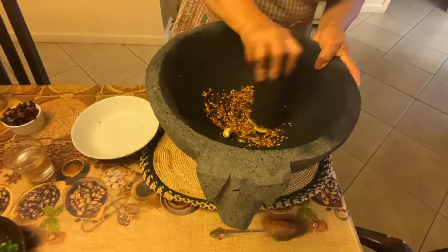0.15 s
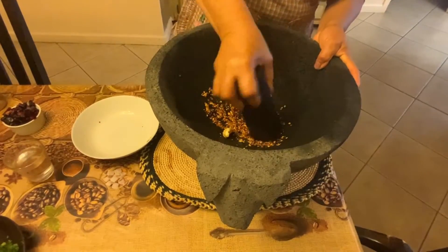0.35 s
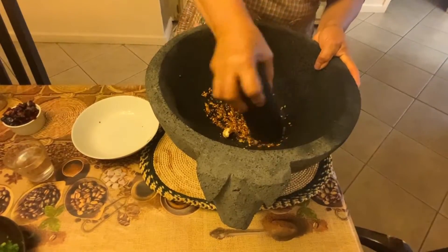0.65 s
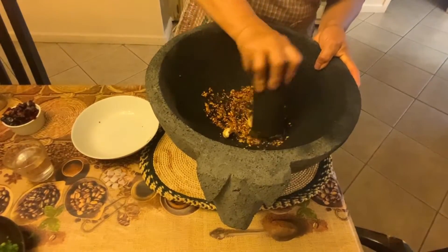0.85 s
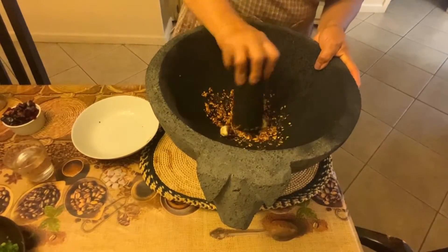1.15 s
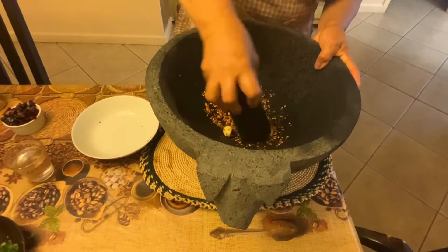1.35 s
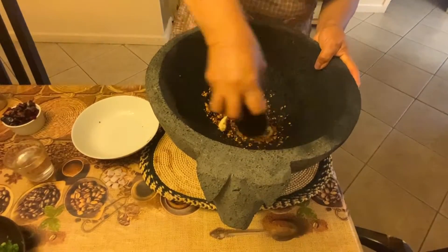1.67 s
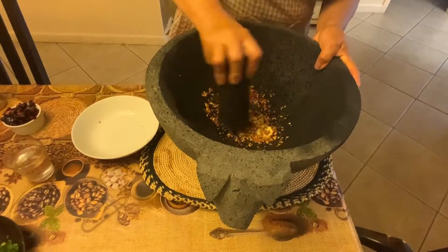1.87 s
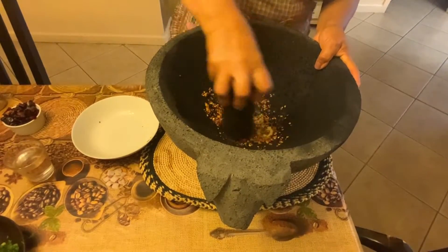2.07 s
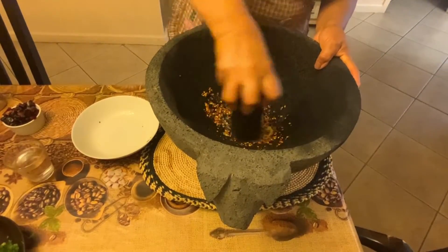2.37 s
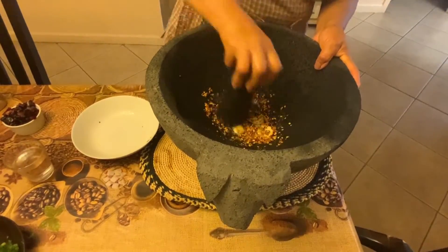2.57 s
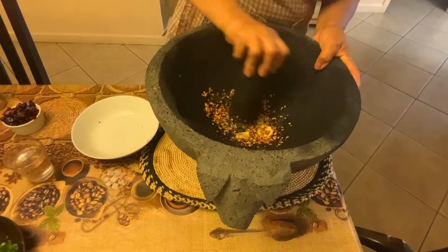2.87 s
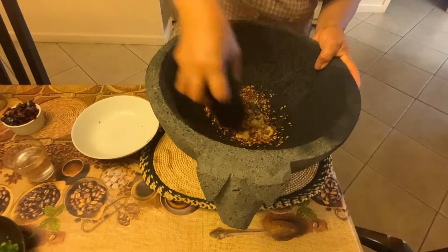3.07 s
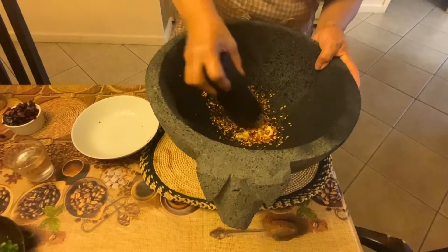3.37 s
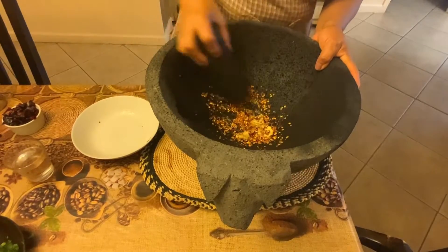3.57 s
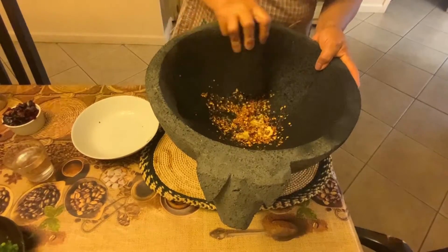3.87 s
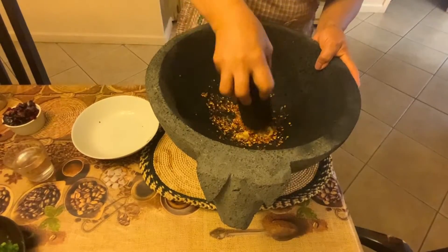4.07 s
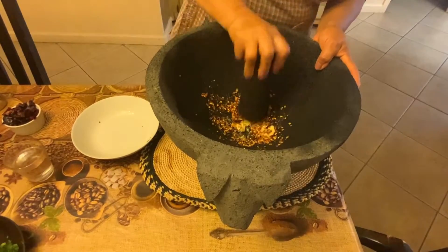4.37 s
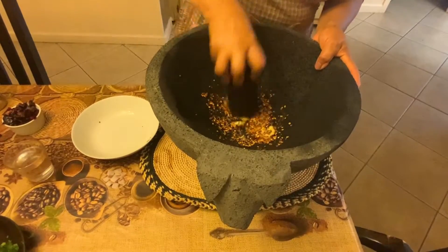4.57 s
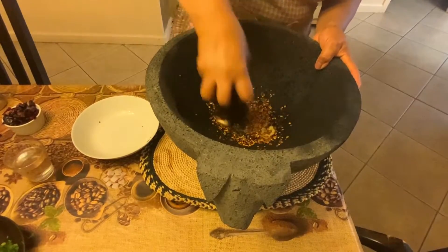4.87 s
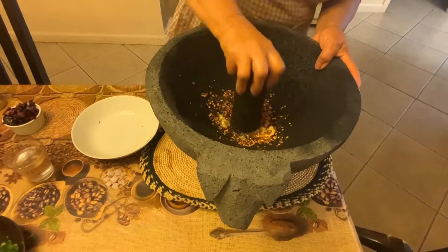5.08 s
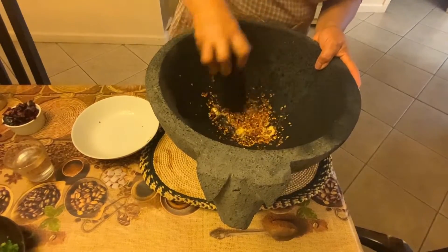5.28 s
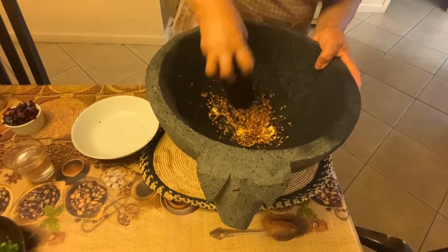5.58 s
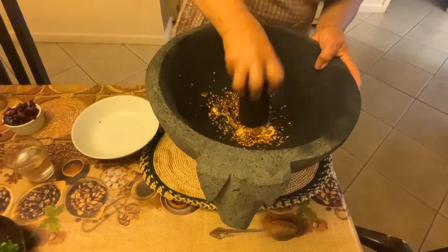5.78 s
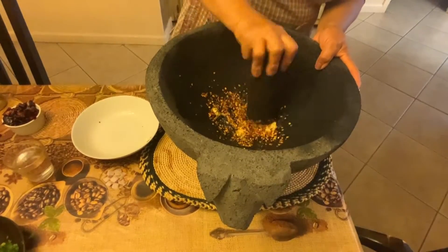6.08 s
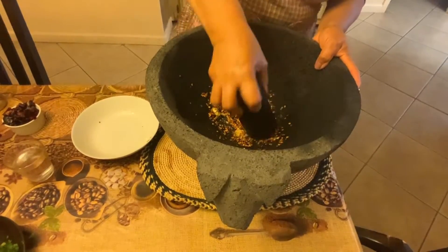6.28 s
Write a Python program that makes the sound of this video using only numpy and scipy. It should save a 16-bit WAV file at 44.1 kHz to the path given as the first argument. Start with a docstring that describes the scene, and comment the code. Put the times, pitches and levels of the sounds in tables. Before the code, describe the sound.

A stone pestle crunches seeds and salt in a heavy stone mortar, with gritty strokes, sharp seed cracks and hollow knocks, close up in a kitchen.

```python
"""Stone mortar on a kitchen table

A stone pestle works seeds, garlic and salt in a stone mortar on a cloth-covered table, close to two microphone ports.
Strokes crush showers of grains, made of random impulses; seeds snap in quick runs of cracks.
Where stone meets bare stone the pestle knocks, judders and pings, from filtered taps, slips and decaying sines.
The heavy bowl rocks the table into a low resonant rumble; the bowl and the tiled kitchen answer, over faint air."""
import sys
import numpy as np
from scipy import signal
from scipy.fft import rfft, irfft, next_fast_len
from scipy.io import wavfile
from scipy.ndimage import uniform_filter1d, map_coordinates

SR = 44100
rng = np.random.default_rng(int(sys.argv[2]) if len(sys.argv) > 2 else 0)


def pcm_store(signal):
    """Save signal as 16-bit PCM."""
    levels = np.round(np.clip(np.atleast_2d(signal), -1, 1) * 32767)
    wavfile.write(sys.argv[1], SR, levels.astype(np.int16).T)


N = 283563  # length in samples

# spectrum of crushed grains: (frequency [Hz], relative density [dB per Hz])
GRIT_SPECTRUM = [(150, -31), (350, -8), (600, -15.5), (1200, -10.5), (2000, -4.5), (2550, -5), (3300, -0.5),
                 (4700, -1), (5600, 4.5), (7000, -2), (8200, -2), (10500, -8), (16000, -12.5)]
# resonances of the bowl's hollow: (frequency [Hz], width [Hz], relative level [dB])
BOWL_MODES = [(209, 56, 0), (345.4, 42, 10.5), (503, 121, 12), (884, 290, 8.5), (1387, 253, 7.5),
              (1694, 146, 10.5), (2040, 480, 4.5)]
# resonances of the table under the bowl: (frequency [Hz], width [Hz], relative level [dB])
TABLE_MODES = [(67.3, 28.5, 0.5), (89.3, 25, 4), (128.6, 16, 0), (229, 36.3, -15.5), (356, 35, -15.5)]
# soft push of a seed rolled under the pestle: (frequency [Hz], relative density [dB per Hz])
BUMP_SPECTRUM = [(25, -16), (55, -7.5), (400, -2.5), (900, 11.5), (3000, -78)]


def amp(db):
    """Decibels to gain."""
    return 10 ** (np.asarray(db) / 20)


def unit(x):
    """x at rms 1."""
    return x / np.sqrt(np.mean(x ** 2) + 1e-20)


def along(points, hz):
    """(Hz, value) points read on a log frequency axis."""
    f, v = np.transpose(points)
    return np.interp(np.log(hz + 1), np.log(f + 1), v)


def wobble(rate):
    """A smooth random curve, rate knots a second."""
    knots = rng.standard_normal(int(N * rate / SR) + 4)
    return map_coordinates(knots, [np.arange(N) * rate / SR])


def filtered(x, response):
    """x times a complex response of frequency."""
    n = x.shape[-1]
    # padding leaves room for ringing
    m = 2 * next_fast_len(n // 2 + SR // 10, real=True)
    spectrum = rfft(x, m) * response(np.fft.rfftfreq(m, 1 / SR))
    return irfft(spectrum, m)[..., :n]


def coloured(x, spectrum):
    """x through the causal, minimum-phase filter with this (Hz, dB) spectrum."""
    def response(hz):
        cepstrum = irfft(np.log(amp(along(spectrum, hz))))
        half = len(cepstrum) // 2
        # folding the cepstrum forward in time makes the filter causal
        folded = np.r_[cepstrum[0], 2 * cepstrum[1:half]]
        return np.exp(rfft(folded, 2 * half))
    return filtered(x, response)


def resonate(x, modes):
    """x through a body with (Hz, width, dB) resonances of alternating sign."""
    def response(f):
        total = 0
        for k, (centre, width, db) in enumerate(modes):
            damping = 1j * f * width
            total = total + (-1) ** k * amp(db) * damping / (centre * centre - f * f + damping)
        return total
    return filtered(x, response)


def add(track, s, sound):
    """Mix a sound into the track at time s."""
    part = track[max(round(s * SR), 0):][:len(sound)]
    part += sound[:len(part)]


def fractures(rate, spread_db, size=N):
    """Random impulses of either sign, rate a second: many small, a few large."""
    sizes = amp(spread_db * np.minimum(rng.standard_exponential(size), 4))
    struck = rng.random(size) < rate / SR
    return struck * sizes * rng.choice([-1, 1], size)


def levelled(x, size):
    """x near rms 1 over every short stretch of about size samples, its fine grain kept."""
    power = uniform_filter1d(uniform_filter1d(x ** 2, size), size // 2)
    return x / np.sqrt(np.abs(power) + 1e-4 * np.mean(x ** 2))


def stroke(s, length, db, swell_db, attack, release, tail_db, tail):
    """Gain of one movement: it bites, swells, lets go and trails off; attack, release and tail are times for 60 dB."""
    out = np.zeros(N)
    t = np.arange(-min(SR // 10, round(s * SR)), SR * 3 // 4) / SR
    before, after = np.maximum(-t, 0), np.maximum(t - length, 0)
    held_db = db - swell_db * (1 - np.clip(t / length, 0, 1)) - 60 * before / attack
    fall_db = np.maximum(-60 * after / release, tail_db - 60 * after / tail)
    add(out, s + t[0], amp(held_db + fall_db))
    return out


def crunch(rate=3000, spread_db=1.5, clump_db=2.5, own_db=3.0, level_db=-1.0):
    """Grains break in clumps under the pestle; fine salt sounds brighter than husks."""
    gain, tilt_db = crushing()
    clumps = fractures(rate, spread_db) * amp(clump_db * wobble(140))
    grains = coloured(clumps, GRIT_SPECTRUM)
    fine = filtered(grains, lambda hz: hz ** 8 / (hz ** 8 + 8500. ** 8))
    coarse = filtered(grains, lambda hz: 1 / (1 + (hz / 4500) ** 8))
    # each grain size comes and goes in its own clumps
    sizes = [coarse, grains - coarse - fine, amp(tilt_db) * fine]
    mix = sum(part * amp(own_db * wobble(60)) for part in sizes)
    return amp(level_db) * gain * levelled(mix, size=700)


def crushing(attack=0.048, release=0.11, tail_db=-11, tail=0.4, dust_db=-13, dust_tilt_db=3):
    """Gain and treble tilt of the grit: the heaps that break, over dust that grates under any load."""
    # the pestle runs into a heap of grains: (start [s], length [s], relative level at the end [dB],
    # swell on the way [dB], fineness as treble tilt [dB])
    heap_strokes = [(.02, 0.096, -35.5, 6, 8.5), (0.203, 0.06, -24.5, 8, 13), (.378, 0.025, -25, 5, 5.5),
                    (0.506, 0.056, -26, 12, 12), (0.798, 0.037, -32, -6.5, 13),
                    (0.897, 0.042, -39.5, -10, 20.5), (1.027, 0.056, -27.5, 18, 8.5),
                    (1.16, 0.098, -30, 14.5, 3), (1.385, 0.036, -35.5, -3, 12),
                    (1.444, 0.031, -33.5, 12, 6), (1.539, 0.065, -39.5, 2, 8),
                    (1.758, .03, -36.5, -0.5, 3.5), (1.864, 0.057, -33.5, 7, 2.5),
                    (2.014, 0.095, -33.5, 18.5, 8.5), (2.19, 0.082, -32.5, 2.5, 4),
                    (2.367, 0.077, -30.5, 5.5, 14), (2.488, 0.0078, -32.5, -1, 4.5),
                    (2.562, 0.029, -32.5, -3.5, 5.5), (2.73, 0.061, -35, 13, 13), (2.866, 0.064, -40, 5, 2),
                    (3.122, 0.053, -46.5, -3, -3), (3.197, 0.038, -22.5, 8.5, 5.5),
                    (3.478, 0.07, -46, -2, -3), (3.574, 0.0085, -23.5, 4.5, 2.5),
                    (3.886, 0.035, -28.5, 4.5, -2), (4.109, 0.052, -29, 12.5, 9),
                    (4.175, 0.045, -28.5, 6, -6), (4.285, 0.046, -42, -4, 9), (4.36, 0.049, -37, -1, -0.5),
                    (4.515, 0.043, -26, 13.5, 0.5), (4.662, 0.046, -31, 13, -3), (4.819, 0.072, -31, 9, 0),
                    (4.969, 0.078, -26.5, 1.5, -1), (5.17, 0.074, -35, 5, 8), (5.292, 0.014, -25, 12, 8),
                    (5.355, 0.061, -32, -3, -0.5), (5.521, 0.044, -28, 8.5, 7),
                    (5.676, 0.032, -24, -3.5, 1.5), (5.968, 0.052, -30, 1.5, 5),
                    (6.074, 0.018, -29.5, 7, 5.5), (6.157, 0.031, -30.5, -0.5, 5),
                    (6.311, 0.045, -25.5, 2, 7.5), (6.426, 0.014, -26, 3.5, 2)]
    dust_full_db = -41  # load above which the dust grates no louder
    heaps = []
    for s, length, db, swell_db, tilt_db in heap_strokes:
        gain = stroke(s, length, db, swell_db, attack, release, tail_db, tail)
        heaps.append((gain ** 2, tilt_db))
    dust = amp(dust_db) ** 2 * np.minimum(load(), amp(dust_full_db) ** 2) + 1e-12
    heaps.append((dust, dust_tilt_db))
    power = sum(p for p, _ in heaps)
    mean_tilt_db = sum(p * tilt_db for p, tilt_db in heaps) / power
    return np.sqrt(power), mean_tilt_db


def snaps(life=0.0096, level_db=-13):
    """A seed splits in a quick run of cracks that fades by 60 dB in life seconds."""
    # single seeds snapping: (time [s], relative level [dB])
    seed_snaps = [(0.197, -31.5), (0.527, -27), (0.551, -16.5), (0.6003, -30), (0.895, -28),
                  (1.1981, -20.5), (1.3887, -39), (1.5487, -23.5), (2.1908, -29), (2.2779, -20.5),
                  (2.782, -23.5), (2.9557, -22.5), (3.1146, -19), (3.2046, -23), (3.476, -19), (3.58, -15),
                  (3.7903, -31.5), (3.818, -36), (4.115, -24), (4.5386, -22.5), (4.9696, -42),
                  (5.3088, -16), (5.6285, -24), (5.9112, -25), (6.3034, -43)]
    out, t = np.zeros(N), np.arange(SR // 20) / SR
    for s, db in seed_snaps:
        cracks = fractures(20000, 3.8, size=len(t))
        crack = cracks * amp(-60 * t / life)
        add(out, s, amp(db + level_db) * unit(crack))
    return coloured(out, GRIT_SPECTRUM)


def knocks(level_db=-2, thump_db=-23, travel=.004, lead=0.002636, spot_db=1):
    """A blow sounds the hollow of the bowl and shakes the table; it starts lead seconds early."""
    # pestle hitting the bowl: (time [s], relative level [dB], bass weight [dB])
    blows = [(0.417, -22, 44), (0.475, -31, 32), (0.506, -27, 16), (0.528, -10, 5), (0.697, -2, 2.5),
             (1.022, -21.5, -15), (1.045, -25, -23), (1.295, -24, -18), (1.388, -13, -2), (1.722, 0.5, -4),
             (2.417, -20, -2), (2.653, -35, 72), (3.114, -5.5, 6.5), (3.156, -17, 21), (3.477, 1.5, -7),
             (3.55, -21, 15), (3.559, -16, 20), (3.569, -7.5, 9), (3.581, -7, -7), (3.791, 0, 3),
             (3.882, -16, 16), (5.182, -10.5, -11), (5.232, -5.5, 4.5), (5.629, -15, 26),
             (5.661, -12.5, 19), (5.911, 2, -5.5)]
    # treble edge of a stone-on-stone contact: (frequency [Hz], relative level [dB])
    contact_edge = [(2050, -3), (2450, -5.5), (3200, -8), (4200, -25), (7000, -24)]
    out, t = np.zeros(N), np.arange(SR // 8) / SR
    tap = 1. * (t == 0)
    thump = bending(resonate(coloured(tap, BUMP_SPECTRUM), TABLE_MODES), travel)
    # each spot of the bowl drives its modes a little differently
    spots = spot_db * rng.standard_normal((len(blows), len(BOWL_MODES)))
    for (s, db, bass), spot in zip(blows, spots):
        # a cushion of crushed food lengthens the contact and favours the bass
        cushion = [(60, bass - 6), (260, bass + 6), (500, bass), (1250, bass / 2 + 4), (1750, 2.2)]
        force = coloured(tap, [*cushion, *contact_edge])
        modes = BOWL_MODES + np.outer(spot, [0, 0, 1])
        hollow = bending(resonate(force, modes), travel)
        blow = amp(level_db) * hollow / np.abs(hollow).max() + amp(thump_db) * thump / np.abs(thump).max()
        add(out, s - lead, amp(db) * blow)
    return out


def bending(x, travel):
    """Bending waves in a thick wall: treble outruns bass; travel is the delay in seconds at 1 kHz."""
    return filtered(x, lambda hz: np.exp(-4j * np.pi * travel * np.sqrt(1000 * hz)))


def pings():
    """With no food between the stones, the pestle rings out."""
    # pestle catching bare stone: (time [s], relative level [dB])
    bare_contacts = [(0.699, -32.5), (1.722, -46), (3.4775, -13.5), (3.79, -41), (5.6291, -35),
                     (5.911, -37)]
    out = np.zeros(N)
    for s, db in bare_contacts:
        add(out, s, amp(db) * ping(np.arange(SR // 8) / SR))
    return out


def ping(t):
    """The short stone pestle ringing along its length, as decaying sines."""
    # free ring of the pestle: (frequency [Hz], relative level [dB], 60 dB decay time [s])
    pestle_modes = [(7625, 0, .065), (7900, -14, .06)]
    return sum(amp(db - 60 * t / t60) * np.sin(2 * np.pi * hz * t) for hz, db, t60 in pestle_modes)


def drags(rate=600, spread_db=4.5, level_db=-1, stiffen=1.035, attack=0.017, release=0.036, tail_db=-15, tail=0.14):
    """The pestle judders over the pores of the stone; each uneven slip sounds the bowl."""
    # stone dragged over bare stone: (start [s], length [s], relative level at the end [dB],
    # swell on the way [dB], pestle's ring relative to the stroke [dB])
    bare_drags = [(0.413, 0.011, -33, 3, -30), (0.478, 0.025, -29.5, 1, -20),
                  (0.499, 0.031, -20.5, 3, -14.5), (0.529, 0.017, -17.5, 5, -30),
                  (0.597, 0.044, -42, -12, -30), (0.997, 0.061, -40.5, -5, -18),
                  (2.398, 0.034, -30, 13, -23), (3.127, .14, -20, 10, -24), (3.49, 0.105, -22.5, 0, -23),
                  (3.872, 0.014, -38, 14, -24), (5.66, 0.041, -16.5, 4.5, -25)]
    # spectrum of dragged stone before the bowl: (frequency [Hz], relative density [dB per Hz])
    rasp_spectrum = [(150, -6), (280, 9.5), (480, 1), (800, -1.5), (1200, -6.5), (1750, -7.5), (2200, -20),
                     (3500, -19), (6000, -77)]
    force, squeak = np.zeros(N), np.zeros(N)
    for s, length, db, swell_db, ring_db in bare_drags:
        gain = stroke(s, length, db, swell_db, attack, release, tail_db, tail)
        force += gain
        squeak += amp(ring_db) * gain
    slips = fractures(rate, spread_db)
    rasp = resonate(coloured(slips, rasp_spectrum), BOWL_MODES)
    # pressed against the bowl, the pestle rings a little higher
    pressed_ring = ping(stiffen * np.arange(SR // 8) / SR)
    ring = signal.oaconvolve(slips, pressed_ring)[:N]
    return amp(level_db) * force * levelled(rasp, size=700) + squeak * unit(ring)


def rumble(rate=170, spread_db=3, level_db=-1):
    """The pestle bumps over seeds, and the bowl passes each bump to the table."""
    bumps = coloured(fractures(rate, spread_db), BUMP_SPECTRUM)
    shaken = levelled(resonate(bumps, TABLE_MODES), size=1500)
    return amp(level_db) * np.sqrt(load()) * shaken


def load(attack=0.054, release=0.21, tail_db=-12, tail=0.85, swell_db=-1.1):
    """Power with which the arm bears on the bowl."""
    # the arm's weight comes down and rocks the table: (start [s], length [s], relative level [dB])
    arm_pushes = [(0.018, 0.2, -41.5), (0.259, 0.042, -35.5), (0.424, 0.016, -26), (0.508, 0.098, -27),
                  (0.71, 0.016, -22.5), (0.786, 0.05, -33.5), (0.918, 0.052, -39.5), (1.019, 0.069, -32),
                  (1.2, 0.26, -38.5), (1.398, 0.017, -26), (1.47, 0.16, -46), (1.738, 0.015, -19.5),
                  (2.029, 0.2, -45), (2.278, 0.042, -41), (2.377, 0.23, -37), (2.738, 0.24, -43),
                  (3.127, 0.15, -25.5), (3.576, 0.048, -27), (3.789, 0.21, -38), (4.138, 0.075, -37.5),
                  (4.255, 0.2, -43), (4.555, 0.15, -38.5), (4.888, 0.18, -32.5), (5.224, 0.05, -23),
                  (5.313, 0.1, -34), (5.551, 0.042, -33), (5.679, 0.058, -28.5), (5.926, 0.015, -21.5),
                  (5.968, 0.25, -39), (6.309, 0.09, -37.5)]
    return sum(stroke(s, length, db, swell_db, attack, release, tail_db, tail) ** 2
               for s, length, db in arm_pushes)


def echo(x, space, delay):
    """Diffuse reflections as decaying noise, different at each microphone port, after delay seconds."""
    f, t60, level = np.transpose(space)
    hz, t, z = signal.stft(rng.standard_normal((2, SR // 2)), SR, nperseg=128)
    fade = amp(-60 * t / along(np.c_[f, t60], hz)[:, None])
    # equal energy in every band before the echo levels colour it
    even_fade = fade / np.sqrt(np.mean(fade ** 2, axis=1, keepdims=True))
    tail = signal.istft(z * even_fade, SR, nperseg=128)[1]
    tail = coloured(tail / np.sqrt(tail.shape[1]), np.c_[f, level])
    late = np.pad(x, (round(delay * SR), 0))
    return signal.oaconvolve(late[None], tail, axes=1)[:, :N]


def air(level_db=-59):
    """The faint steady hush of the room: noise partly shared by the two ports."""
    # still kitchen air: (frequency [Hz], relative density [dB per Hz])
    air_spectrum = [(25, -20.5), (60, -12), (130, -32), (300, -18.5), (1500, -13), (4000, -22),
                    (16000, -28)]
    shared = rng.standard_normal(N)
    hush = shared + 0.75 * rng.standard_normal((2, N))
    return amp(level_db) * unit(coloured(hush, air_spectrum))


def scene(flank_db=-14):
    """The mortar just in front of two microphone ports, in the kitchen; grains on the pestle's flanks widen the grit."""
    # phase lead of the left port over the right: (frequency [Hz], lead [rad])
    port_lead = [(450, 0), (850, .6), (1400, .3), (1900, -1.2), (2400, -2.7), (3200, -4.8), (4200, -6.1),
                 (4900, -7.1), (5700, -6.4), (6400, -6.2), (7150, -5.2), (8200, -6.3)]
    # level of the left port over the right: (frequency [Hz], lean [dB])
    port_lean = [(130, 0), (300, 3), (600, 3), (1200, 0)]
    # echoes inside the bowl: (frequency [Hz], 60 dB decay time [s], relative level [dB])
    bowl_echo = [(102, 0.0079, -82), (425, 0.013, -4), (1000, 0.18, -5.5), (2870, 0.021, -6),
                 (6940, 0.0071, -0.5), (11900, 0.0042, -19)]
    # echoes of the kitchen: (frequency [Hz], 60 dB decay time [s], relative level [dB])
    kitchen_echo = [(70, 0.072, -23.5), (203, 1, -14), (470, 0.24, -2), (1570, 0.57, -6),
                    (3150, 0.32, -7.5), (7840, 0.27, -9.5), (15000, 0.24, -15)]
    mortar = crunch() + snaps() + knocks() + pings() + drags() + rumble()
    sides = np.array([[.5], [-.5]])  # left, right
    wide = mortar + 2 * sides * amp(flank_db) * crunch()

    def ports(hz):
        return np.exp(1j * sides * along(port_lead, hz)) * amp(sides * along(port_lean, hz))
    direct = filtered(wide, ports)
    return direct + echo(mortar, bowl_echo, delay=.0008) + echo(mortar, kitchen_echo, delay=.005) + air()


def record(dry, top_hz=16100):
    """The recorder rounds off peaks near full scale and cuts steeply above top_hz."""
    rounded = dry / (1 + np.abs(dry) ** 8) ** (1 / 8)
    return filtered(rounded, lambda hz: 1 / (1 + (hz / top_hz) ** 160))


dry = scene()
out = record(dry)
pcm_store(out)
```